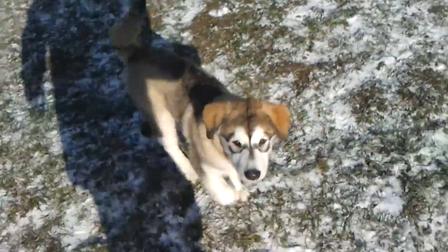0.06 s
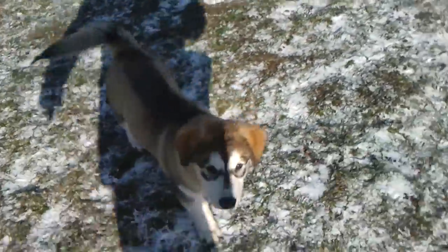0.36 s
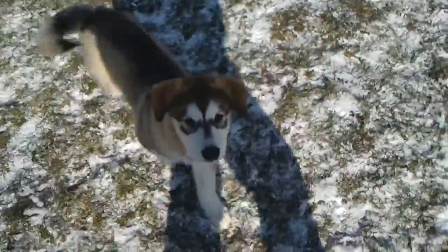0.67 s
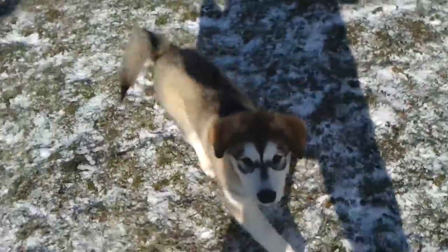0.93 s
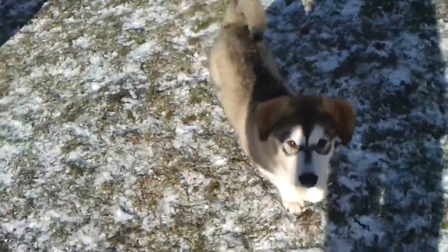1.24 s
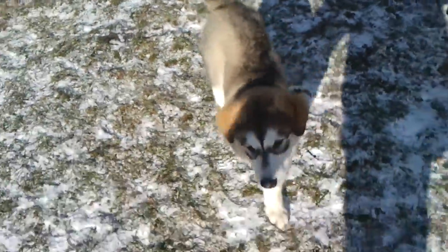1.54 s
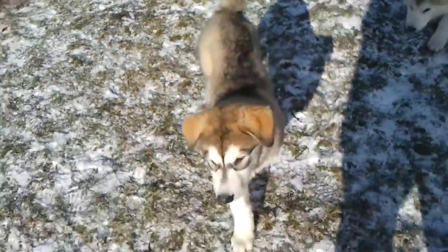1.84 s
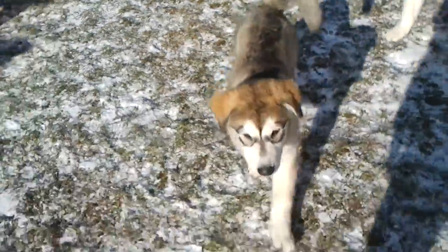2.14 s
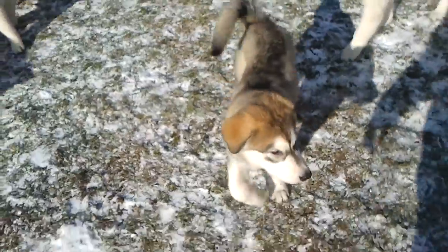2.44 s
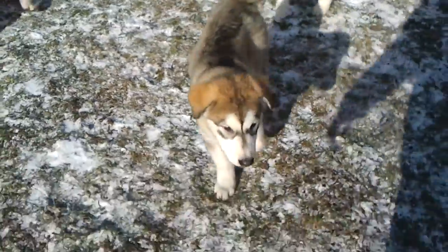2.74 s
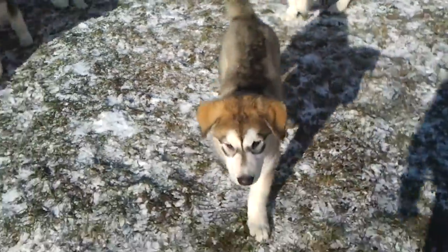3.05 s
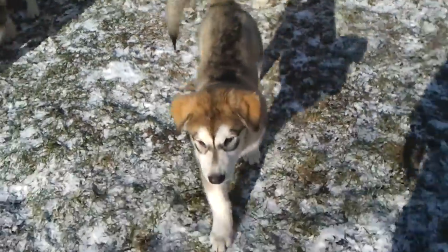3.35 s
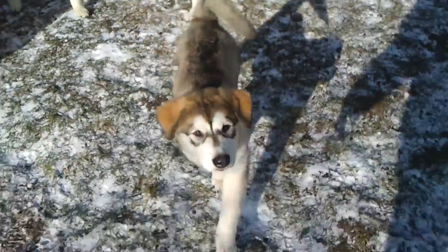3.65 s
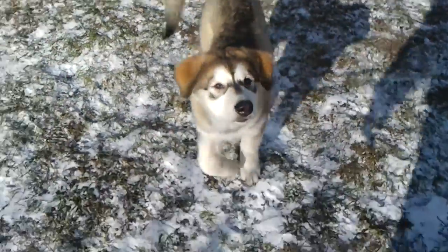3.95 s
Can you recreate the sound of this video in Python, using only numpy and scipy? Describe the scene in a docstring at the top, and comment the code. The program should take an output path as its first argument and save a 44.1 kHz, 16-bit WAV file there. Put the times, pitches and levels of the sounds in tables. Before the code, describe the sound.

Footsteps of a puppy and a person crunch lightly on frozen grass and thin snow, close to the microphone. Low wind buffets run through the first part and drop away, while crisp snaps stand out above a steady open-air hiss.

```python
"""Footsteps on frosty grass

A puppy and a walker pass close to a hand-held microphone. Their feet load the frozen blades, which fail
by brittle fracture: a swell of fine crackle over a duller crunch of snow. The thin crust breaks, bits of
ice snap, packed snow creaks faintly, and twice something clinks. Turbulent wind buffets and thumps the
microphone for the first two and a half seconds, over a steady outdoor hiss."""
import sys
import numpy as np
from scipy import signal
from scipy.fft import rfft, irfft
from scipy.io import wavfile
from scipy.ndimage import uniform_filter1d

SR = 44100
rng = np.random.default_rng(int(sys.argv[2]) if len(sys.argv) > 2 else 0)


def log_audio(samples):
    """Write samples as a 16-bit WAV file to the path given in sys.argv[1]."""
    # one column per channel
    frames = np.atleast_2d(samples).T
    # limit to full scale, then quantise
    limited = np.clip(frames, -1, 1)
    pcm = np.round(limited * 32767).astype(np.int16)
    wavfile.write(sys.argv[1], SR, pcm)


N = 176400
T = np.arange(N) / SR
FREQ = np.maximum(np.fft.rfftfreq(N, 1 / SR), 1)

# Spectra of open air, of cracking blades and of cracking crust: f/Hz, relative spectral level/dB
AIR_SPECTRUM = [(25, 4.5), (70, -5.5), (140, 1), (280, -6.5), (490, -6.5), (550, -4.5), (610, -7),
                (720, -9), (1200, -12), (1800, -16), (2600, -24), (3600, -28.5), (5200, -29), (7400, -23),
                (8200, -31.5), (9000, -54)]
BLADE_SPECTRUM = [(300, -23.5), (1500, -1.5), (3000, -5.5), (4500, -0.5), (6000, 2.5), (7500, 6.5),
                  (8300, -2), (9000, -34)]
CRUST_SPECTRUM = [(300, -11.5), (1500, -14.5), (3000, -0.5), (4500, 5), (6000, 8.5), (7500, 8.5), (8300, 0),
                  (9000, -38.5)]
# Faint crackle of grass between the steps: t/s, level/dB
RUSTLE_LEVELS = [(0, -47.5), (.4, -52), (.55, -48.5), (1, -49.5), (1.35, -51.5), (1.65, -46), (1.8, -57.5),
                 (2.2, -50.5), (2.55, -56), (3.1, -49), (3.3, -44.5), (3.5, -56.5), (4, -56)]
# Rumble of wind on the microphone: t/s, level/dB
WIND_LEVELS = [(0, -35), (.05, -25), (.2, -28), (.35, -31.5), (.46, -26), (.54, -38), (.63, -50),
               (.69, -38), (.75, -26), (.92, -27), (1.1, -35.5), (1.4, -32.5), (1.56, -42), (1.8, -29.5),
               (1.92, -35.5), (2.2, -32), (2.54, -27.5), (2.68, -46), (4, -41.5)]
# Short buffets: centre t/s, Gaussian width/s, level/dB, upper edge f/Hz
WIND_BUFFETS = [(0.079, 0.038, -25, 121), (0.411, 0.012, -25.5, 265), (0.787, 0.026, -26, 90),
                (0.984, 0.012, -23.5, 130), (1.204, 0.0061, -25, 95), (1.448, 0.022, -29, 62),
                (2.069, 0.02, -28, 63.5), (2.189, 0.026, -26.5, 77), (2.326, 0.012, -25, 135),
                (2.467, 0.028, -24, 92.6)]
# Lone eddies: centre t/s, peak level before the high-pass/dB, f/Hz
EDDY_THUMPS = [(.064, -16, 109), (.082, -14.5, 94), (0.112, -14.5, 78), (.178, -17, 69.6),
               (.423, -15.5, 70), (0.783, -15.5, 66.3), (.814, -12, 62.4), (0.953, -12.5, 72),
               (.969, -11.5, 84), (1.01, -14.5, 114), (1.233, -19, 175), (1.283, -18, 76), (1.37, -18, 78),
               (1.739, -20.5, 75.5), (1.757, -14, 62), (2.27, -19, 79), (2.323, -23, 130),
               (2.511, -19.5, 94), (2.551, -21, 71.6)]
# Sharp cracks of frozen blades: t/s, starting level/dB, decay time/s
BLADE_CRACKS = [(0.085, -29.5, 0.0035), (0.7414, -30, 0.0024), (1.120, -27.5, 0.0013), (1.443, -42, .0015),
                (1.5625, -32.5, .0015), (1.8857, -32, 0.0027), (2.044, -32.5, 0.0018),
                (2.3967, -30.5, 0.0026), (3.374, -29.5, 0.0016), (3.4247, -34.5, .0015),
                (3.7882, -35, 0.0017)]
# Snaps of ice and stalks: t/s, envelope peak/dB, f/Hz, ring time/s
ICE_SNAPS = [(.108, -24.5, 1290, 0.0003), (0.6176, -30.5, 1760, 0.00061), (0.658, -28.5, 1480, 0.00022),
             (.809, -29, 1600, .00025), (.85, -25.5, 1300, 0.00019), (0.8938, -28.5, 1760, 0.00045),
             (0.9188, -30, 1430, 0.00036), (0.9845, -32, 1360, 0.00022), (1.036, -28.5, 1550, 0.00052),
             (1.106, -26.5, 1870, 0.00073), (1.886, -30, 1500, 0.00023), (1.8875, -33, 3500, .0002),
             (2.6284, -13.5, 770, 0.00034), (2.6932, -20, 1390, 0.00028), (2.6964, -11, 1394, 0.0004),
             (2.713, -32, 1650, 0.00034), (3.1525, -14.5, 7100, 0.00018), (3.153, -16, 1290, 0.0001),
             (3.198, -21, 1350, 0.00076), (3.217, -25, 1920, .0004), (3.2504, -17.5, 1790, 0.00019),
             (3.251, -29.5, 624, 0.0011), (3.2531, -22, 2740, 0.00041), (3.7882, -26.5, 1740, 0.00037)]
# Clinks at the two hardest breaks: t/s, level/dB
CLINK_STRIKES = [(2.096, -37.5), (3.2514, -29)]
# Tuning of each clink: factor on all mode frequencies
CLINK_TUNINGS = [1.05, 1.0]
# Modes of the clinking object: f/Hz before tuning, relative level/dB, 60 dB decay time/s
RINGING_MODES = [(1950, -5, .14), (2260, -2, .05), (2470, -2, .06), (2800, -2, .06), (2940, -1, .09),
                 (3030, -1, .06), (3408, -1, .085), (3886, -7, .09), (4652, -2, .07), (6027, -3, .06),
                 (7480, 2, .08), (8030, -1, .07)]
# Creaks under a sole: centre t/s, Gaussian width/s, level/dB, f/Hz, glide/(Hz/s), bandwidth/Hz
SNOW_CREAKS = [(1.136, 0.017, -38, 1430, -2000, 119), (2.165, .035, -43.5, 1710, 504, 45),
               (3.333, 0.02, -50, 805, 3000, 40)]
# The crust gives way: onset t/s, hold/s, crackle level/dB, crunch level/dB, crunch f/Hz
CRUST_BREAKS = [(0.43, 0.013, -38, -45, 1510), (0.476, 0.02, -45.5, -52, 1500),
                (1.034, 0.0022, -38.5, -45, 1580), (1.288, .012, -46.5, -46.5, 1520),
                (1.889, 0.0019, -44, -44.5, 1500), (2.089, 0.01, -30, -33.5, 1410),
                (2.392, 0.003, -41, -55.5, 1480), (2.626, 0.0037, -37.5, -30.5, 746),
                (3.25, 0.0093, -29, -31, 1550), (3.371, 0.0024, -37, -48, 1400),
                (3.533, 0.024, -41.5, -50, 1320), (3.589, 0.029, -47, -68, 1400),
                (3.78, .005, -45, -48, 1400)]
# Feet press the grass: peak t/s, rise/s, fall/s, crackle level/dB, crunch level/dB, crunch f/Hz
FOOT_TREADS = [(0.014, 0.024, 0.014, -42.5, -47, 1250), (0.088, 0.015, 0.044, -39.5, -44, 1100),
               (0.555, 0.026, 0.033, -43.5, -38.5, 800), (.66, 0.078, 0.089, -45.5, -40, 1290),
               (.815, 0.0074, 0.014, -44, -51.5, 1390), (.895, 0.029, 0.03, -50, -43, 1630),
               (1.117, 0.056, 0.029, -38, -34.5, 1410), (1.177, 0.011, 0.016, -42.5, -52, 1300),
               (1.21, 0.02, 0.011, -37, -44.5, 1290), (1.625, 0.083, 0.035, -42, -35, 980),
               (2.052, 0.031, 0.033, -40, -49, 1300), (2.155, 0.046, 0.042, -41.5, -37.5, 1380),
               (2.248, 0.012, 0.033, -39.5, -44.5, 1100), (2.418, 0.01, 0.012, -44, -61, 1400),
               (2.47, 0.022, 0.024, -43, -47.5, 1390), (2.655, 0.009, 0.014, -49, -40, 1490),
               (2.713, 0.013, 0.027, -61, -37.5, 1330), (2.818, 0.021, 0.027, -38.5, -39.5, 1000),
               (3.149, 0.021, 0.029, -37, -39, 1340), (3.2, 0.0084, 0.011, -35, -27.5, 1620),
               (3.315, 0.055, 0.062, -53, -38, 1020), (3.389, 0.012, 0.018, -34.5, -38, 1290),
               (3.729, 0.0084, 0.024, -39, -35.5, 1240), (3.914, 0.027, 0.021, -35, -37.5, 1110),
               (3.969, 0.0089, 0.021, -37, -44, 1200)]

WIND_LOW_HZ, CRUNCH_TOP_HZ, CLUMP_HZ, CUTOFF_HZ = 21.1, 2204, 109, 8900


def from_db(db):
    """Amplitude ratio of a level in decibels."""
    return 10 ** (np.asarray(db) / 20)


def unit_rms(x):
    """Normalisation to a mean square of one."""
    return x / np.sqrt(np.mean(x ** 2) + 1e-20)


def envelope(points):
    """Gain over time, interpolated in decibels between (t/s, level/dB) points."""
    return from_db(np.interp(T, *np.transpose(points)))


def colour(x, spectrum):
    """Spectral shaping by (f/Hz, level/dB) points on a logarithmic frequency axis; unit RMS."""
    hz, db = np.transpose(spectrum)
    gain = from_db(np.interp(np.log(FREQ), np.log(hz), db))
    return unit_rms(irfft(rfft(x) * gain, N))


def butter(x, hz, kind, order=2):
    """Butterworth filtering, maximally flat in the passband."""
    return signal.sosfilt(signal.butter(order, hz, kind, fs=SR, output="sos"), x)


def fractures(per_s, spread_db):
    """Tiny fractures as a Poisson process: independent impulses of random sign and size."""
    sizes = from_db(spread_db * np.minimum(rng.exponential(1, N), 4))
    return sizes * rng.choice([-1, 1], N) * (rng.random(N) < per_s / SR)


def clumps(depth_db):
    """Random amplitude modulation: blades give way in bunches, so their level flickers."""
    flicker = unit_rms(butter(rng.standard_normal(N), CLUMP_HZ, "low"))
    return from_db(depth_db * np.clip(flicker, -2, 2))


def outdoors():
    """Ambient noise: a stationary hiss of air, with shot noise from grass and lone ticks of frost."""
    hiss = from_db(-39) * colour(rng.standard_normal(N), AIR_SPECTRUM)
    rustle = clumps(depth_db=1.8) * colour(fractures(per_s=1800, spread_db=2.5), BLADE_SPECTRUM)
    ticks = from_db(-16.5) * colour(fractures(per_s=45, spread_db=3), BLADE_SPECTRUM)
    return hiss + envelope(RUSTLE_LEVELS) * (rustle + ticks)


def turbulence(top_hz, size):
    """Turbulent pressure: slow swings modulate the finer eddies above them; about unit RMS."""
    rumble = butter(rng.standard_normal(size), top_hz, "low", order=4)
    rumble = butter(rumble, WIND_LOW_HZ, "high")
    power = uniform_filter1d(uniform_filter1d(rumble ** 2, size=900), size=900)
    swings = unit_rms(rumble / (np.abs(power) + 1e-12) ** .3)  # partly evened in strength
    eddies = unit_rms(butter(rng.standard_normal(size), [top_hz, 2.44 * top_hz], "band"))
    return swings + from_db(-19) * eddies * np.abs(swings)


def wind():
    """Turbulent flow over the microphone gives a low rumble and short buffets of differing bandwidth."""
    out = envelope(WIND_LEVELS) * turbulence(top_hz=82.4, size=N)
    for t, width, db, top_hz in WIND_BUFFETS:
        near = np.arange(SR // 4) + int(np.clip(t * SR - SR // 8, 0, N - SR // 4))
        swell = np.exp(-.5 * ((T[near] - t) / width) ** 2)
        buffet = unit_rms(swell * turbulence(top_hz, size=len(near)))
        out[near] += from_db(db) * np.sqrt(np.mean(swell ** 2)) * buffet
    return out


def thumps():
    """An eddy hitting the microphone is a bipolar pulse: the pressure dips, flips upward and settles."""
    out = np.zeros(N)
    for t, db, hz in EDDY_THUMPS:
        passage = np.clip(2 * np.pi * hz * (T - t), -8, 8)
        out += from_db(db) * passage * np.exp(.5 - .5 * passage ** 2)
    return butter(out, WIND_LOW_HZ, "high", order=1)


def blade_cracks():
    """Brittle fracture of a frozen blade: a sudden bright burst that decays within milliseconds."""
    out, age = np.zeros(N + SR), np.arange(SR // 20) / SR
    noise = colour(rng.standard_normal(N), CRUST_SPECTRUM)
    bursts = noise[:len(age) * len(BLADE_CRACKS)].reshape(len(BLADE_CRACKS), -1)
    for (t, db, decay_s), burst in zip(BLADE_CRACKS, bursts):
        fade = np.exp(-age / decay_s)
        crack = np.sqrt(np.mean(fade ** 2)) * unit_rms(fade * burst)
        out[int(t * SR) + np.arange(len(age))] += from_db(db) * crack
    return out[:N]


def snaps():
    """Damped oscillation: snapped ice or a stalk rings briefly and leaves a faint scattered tail."""
    out, age = np.zeros(N + SR), np.arange(SR // 2) / SR
    for t, db, hz, ring_s in ICE_SNAPS:
        ring = (age / ring_s / 2) ** 2 * np.exp(2 - age / ring_s) * np.sin(2 * np.pi * hz * age)
        octave = [hz / np.sqrt(2), hz * np.sqrt(2)]
        scatter = unit_rms(butter(rng.standard_normal(len(age)), octave, "band"))
        tail = from_db(-33) * scatter * np.exp(-age / (52 * ring_s))
        out[int(t * SR) + np.arange(len(age))] += from_db(db) * (ring + tail)
    return out[:N]


def clinks(rise_s=0.0013):
    """Free vibration of something small and hard: a sum of high, quickly damped modes."""
    out = np.zeros(N)
    for (t, db), tuning in zip(CLINK_STRIKES, CLINK_TUNINGS):
        age = np.maximum(T - t, 0)
        attack = np.minimum(age / rise_s, 1)
        for hz, mode_db, t60 in RINGING_MODES:
            fade = from_db(db + mode_db - 60 * np.minimum(age / t60, 2))
            out += attack * fade * np.sin(2 * np.pi * (hz * tuning * age + rng.random()))
    return out


def creaks():
    """Friction between snow grains drives one narrow resonance, which glides as the snow packs."""
    slips, out = fractures(per_s=1500, spread_db=1.5), np.zeros(N)
    for t, width, db, hz, glide, bandwidth in SNOW_CREAKS:
        lag = T - t
        carrier = np.exp(2j * np.pi * (hz + .5 * glide * lag) * lag)
        # Shifting down, low-passing and shifting back makes a gliding band-pass.
        ring = unit_rms(np.real(carrier * butter(slips / carrier, bandwidth / 2, "low")))
        out += from_db(db) * np.exp(-.5 * (lag / width) ** 2) * ring
    return out


def crunch(impulses, hz, q):
    """Snow underfoot muffles fractures: one broad resonance and a steep loss of treble; unit RMS."""
    body = signal.lfilter(*signal.iirpeak(hz, q, fs=SR), impulses)
    return unit_rms(butter(body, CRUNCH_TOP_HZ, "low", order=6))


def crust_breaks(rise_s=0.0015, fall_s=0.012):
    """Brittle failure: the crust cracks at once, crumbles densely for a moment and falls quiet."""
    crackle = colour(fractures(per_s=12000, spread_db=2), CRUST_SPECTRUM)
    snow = fractures(per_s=6000, spread_db=1.5)
    out = np.zeros(N)
    for t, hold, crackle_db, crunch_db, hz in CRUST_BREAKS:
        collapse = np.clip((T - t) / rise_s, 0, 1) * np.exp(-np.maximum(T - t - hold, 0) / fall_s)
        out += collapse * (from_db(crackle_db) * crackle + from_db(crunch_db) * crunch(snow, hz, q=0.32))
    return out


def treads():
    """Acoustic emission under load: crackle of blades and crunch of snow swell and fade with each tread."""
    crackle = clumps(depth_db=1.0) * colour(fractures(per_s=2600, spread_db=0.5), BLADE_SPECTRUM)
    snow = fractures(per_s=800, spread_db=2.0)
    out = np.zeros(N)
    for t, rise, fall, crackle_db, crunch_db, hz in FOOT_TREADS:
        load = np.exp(-np.maximum((t - T) / rise, (T - t) / fall))
        out += load * (from_db(crackle_db) * crackle + from_db(crunch_db) * crunch(snow, hz, q=1.36))
    return out


def scene():
    """Linear superposition of all sources at one microphone."""
    steps = treads() + creaks() + crust_breaks() + clinks() + snaps() + blade_cracks()
    return (steps + wind() + thumps() + outdoors())[None]


def record(dry):
    """Band limiting: an elliptic low-pass cuts the top treble steeply."""
    return signal.sosfilt(signal.ellip(10, .1, 75, CUTOFF_HZ, fs=SR, output="sos"), dry)


dry = scene()
out = record(dry)
log_audio(out)
```